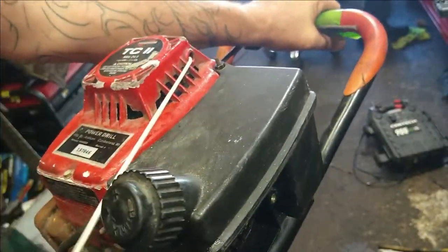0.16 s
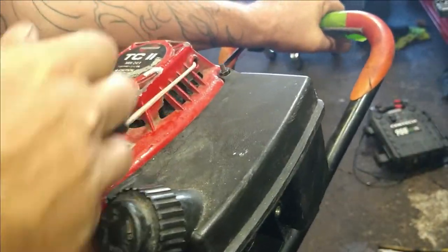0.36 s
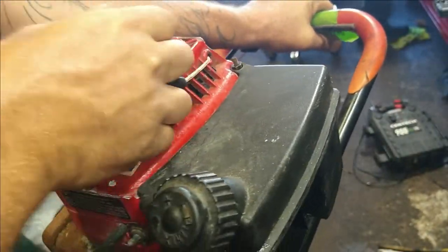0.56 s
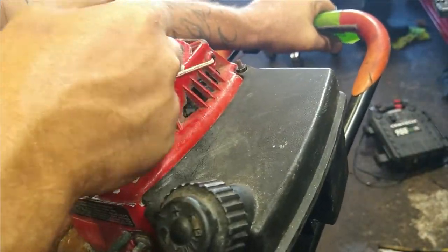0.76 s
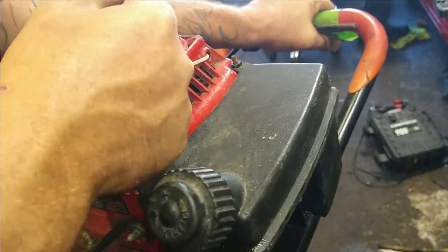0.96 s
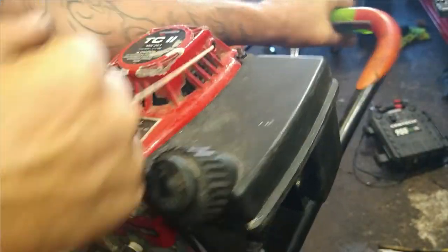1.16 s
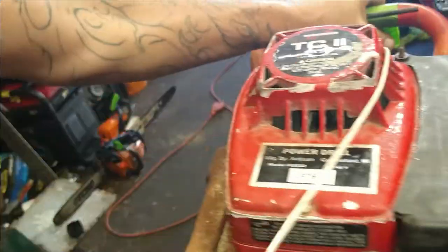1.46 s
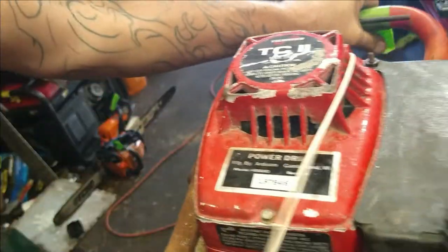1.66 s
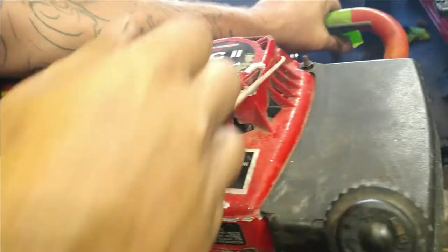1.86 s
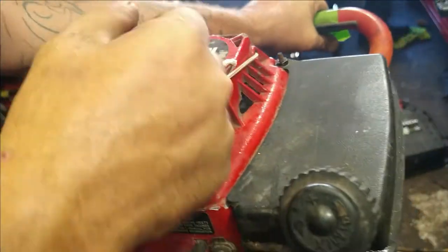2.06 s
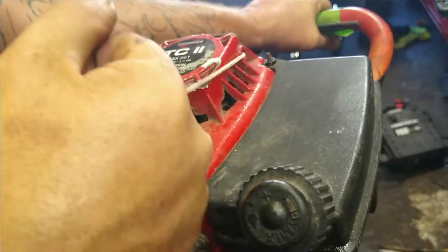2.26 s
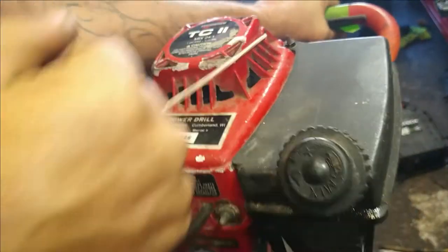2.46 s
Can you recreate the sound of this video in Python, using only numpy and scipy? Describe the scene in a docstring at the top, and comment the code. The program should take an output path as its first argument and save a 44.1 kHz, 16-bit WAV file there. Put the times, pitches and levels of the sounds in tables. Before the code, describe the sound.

A small engine's recoil starter is pulled in a workshop, close up: ratchet clicks slow down, a pause, then a harder pull with rope rasp, knocks and puffs, a long clicking rewind, and another pull beginning.

```python
"""Workshop, close by: the recoil starter of a small two-stroke engine is pulled; the engine never fires.
On each pull filtered noise slips rasp as rope over a low rumble, noise bursts and short rings knock as
the housing, and push-suck pulses puff as the piston. Pawl ticks, faster and then slower, are noise cracks,
pings and chinks over the decaying modes of a steel starter cup. Rope squeaks are rough sine chirps."""
import sys
import numpy as np
from scipy import signal
from scipy.fft import rfft, irfft
from scipy.io import wavfile

SR = 44100
rng = np.random.default_rng(int(sys.argv[2]) if len(sys.argv) > 2 else 0)


def dump_mix(stems):
    """Bounce the given channels to the path in sys.argv[1] as a 16-bit WAV at rate SR."""
    frames = np.atleast_2d(stems).T  # one column per channel
    limited = np.clip(frames, -1, 1)  # hard clip at full scale
    pcm = np.round(limited * 32767).astype(np.int16)
    wavfile.write(sys.argv[1], SR, pcm)


N = 114660
T = np.arange(N) / SR
# shared by pawls, housing and rope: unshared part of the noise power; delay of the shared part on the left
WIDTH, LEFT_LAG_S = 0.4, 0.00013
LOW_PAN_DB = 2  # shared by rumble and piston


def amp(db):
    """Decibels to gain."""
    return 10 ** (np.asarray(db) / 20)


def pan(db):
    """Left and right gains for a source that is db louder on the left."""
    return amp(np.array([[db], [-db]]) / 2)


def colour(x, points):
    """Causal minimum-phase filter through (Hz, dB) points; keeps the power of white noise."""
    point_hz, point_db = np.array(points, float).T
    size = 2 * N
    hz = np.arange(N + 1) * SR / size
    gain = amp(np.interp(np.log(hz + 1), np.log(point_hz), point_db))
    gain = gain / np.sqrt(np.mean(gain ** 2))
    # fold the cepstrum onto positive time for minimum phase
    cepstrum = irfft(np.log(gain))
    cepstrum[1:N] *= 2
    cepstrum[N + 1:] = 0
    response = np.exp(rfft(cepstrum))
    return irfft(rfft(x, size) * response)[..., :N]


def hiss(width, lag_s=0):
    """Noise at two microphones: a shared part, later on the left, and a share of their own."""
    shared, *own = rng.standard_normal((3, N))
    width = np.clip(width, 0, 1)
    common = np.array([np.roll(shared, round(lag_s * SR)), shared])
    return np.sqrt(1 - width) * common + np.sqrt(width) * np.array(own)


def walk(hz):
    """Random points, hz per second, joined by lines; spread near 1."""
    return np.interp(T * hz, np.arange(N), rng.standard_normal(N))


def add(out, s, sound):
    """Mix a sound in at time s."""
    i = int(np.clip(s * SR, 0, N - 1))
    out[..., i:i + sound.shape[-1]] += sound[..., :N - i]


def ping(hz, decay_s, fall_per_s=0):
    """A short damped ring that may sink in pitch, with its own phase at each microphone."""
    t = T[:SR // 10]
    cycles = np.cumsum(hz * np.exp(-fall_per_s * t)) / SR
    wave = np.sin(2 * np.pi * (cycles + rng.random((2, 1))))
    return wave * np.exp(-t / decay_s) * (1 - np.exp(-t * hz / 2))


def pawls():
    """Pawls crack on the cup, bounce once, ping and ring its modes, more fully the closer the ticks."""
    # pawl ticks on the cup: start_s, level_db
    tick_table = [(0.021, -14.5), (0.0702, -16), (0.1087, -10), (0.1346, -9.5), (0.1555, -11.5),
                  (0.1795, -9.5), (0.197, -9), (0.2144, -11), (0.2324, -8), (0.2508, -9), (0.2704, -14),
                  (0.2894, -9), (0.3123, -14), (0.3366, -15), (0.363, -12), (0.4073, -10.5), (0.544, -15.5),
                  (1.1316, -14), (1.4795, -12), (1.4954, -10.5), (1.52, -8), (1.5397, -11), (1.5859, -7),
                  (1.6243, -7), (1.6468, -6.5), (1.6689, -8), (1.685, -9.5), (1.7014, -6), (1.7204, -10.5),
                  (1.7429, -10), (1.7628, -8.5), (1.7859, -10.5), (1.807, -10), (1.8351, -10), (1.8657, -9),
                  (1.903, -10), (1.9583, -9.5), (2.0535, -17), (2.378, -37.5), (2.4651, -11)]
    # steel cup modes: mode_hz, level_db, change_db (once the microphone has swung round the engine)
    cup_modes = [(3537, -4, -9), (3892, -15, -13), (4048, -16, 7), (4317, -14, 11), (4393, -1, -1),
                 (5103, -10, -1), (8050, -14, 0), (9330, -6, -10), (10104, -8, -2), (12995, -9, 1),
                 (13868, -6, -5), (14235, -10, 0)]
    # crack spectrum: freq_hz, relative_db
    crack_spectrum = [(300, -27.5), (800, -6.5), (2000, -7), (3500, 2.5), (5700, -6.5), (7500, -9),
                      (15500, -9)]
    # high chink spectrum: freq_hz, relative_db
    chink_spectrum = [(8800, -25.5), (9900, 1), (11300, -22.5), (13500, -2), (14300, -9.5), (15700, -15)]
    cup_db, cup_scatter_db, cup_t60_s, swing_s = 0.5, 4, 0.17, 1.3
    long_mode, long_t60_s = 1, 0.38  # this mode outlasts the rest
    slow_ring_db, slow_gap_s = -20, 0.08  # full ring loss, from this gap upwards
    detune_hz = 13.8  # spread from tick to tick
    crack_db, crack_rise_s, crack_s, bounce_s = -4, 0.00081, 0.004, 0.004
    chink_db, chink_s = -10.5, 0.011
    ping_low_hz, ping_high_hz, ping_db, ping_s, ping_fall_per_s = 4890, 6620, -5, 0.003, 65

    mode_hz, mode_db, change_db = np.array(cup_modes).T
    is_long = np.arange(len(mode_hz)) == long_mode
    t60_s = np.where(is_long, long_t60_s, cup_t60_s)
    t = T[:SR // 2]
    modes = np.exp((2j * np.pi * mode_hz - np.log(1000) / t60_s)[:, None] * t)
    rings, crack_power, chink_power = np.zeros((2, N)), np.zeros(N), np.zeros(N)
    gaps_s = np.diff(np.array(tick_table)[:, 0], prepend=-1)
    for (s, level_db), gap_s in zip(tick_table, gaps_s):
        slow = min(gap_s / slow_gap_s, 1)
        slow_db = slow_ring_db * np.where(is_long, slow ** 3, np.sqrt(slow))
        scatter_db = cup_scatter_db * rng.standard_normal((2, len(mode_hz)))
        strike = amp(mode_db + slow_db + change_db * (s > swing_s) + scatter_db)
        strike = strike * np.exp(2j * np.pi * rng.random((2, len(mode_hz))))
        detune = np.exp(2j * np.pi * detune_hz * rng.standard_normal() * t)
        add(rings, s, amp(level_db + cup_db) * (strike @ modes * detune).imag)

        crack = amp(level_db) * (1 - np.exp(-t / crack_rise_s)) * np.exp(-t / crack_s)
        for delay_s in 0, bounce_s * (0.5 + rng.random()):
            add(crack_power, s + delay_s, crack ** 2)

        ring = ping(rng.uniform(ping_low_hz, ping_high_hz), ping_s, ping_fall_per_s)
        add(rings, s + bounce_s / 2, amp(level_db + ping_db) * ring)
        add(chink_power, s, (amp(level_db) * np.exp(-t / chink_s)) ** 2)
    cracks = colour(np.sqrt(crack_power) * hiss(WIDTH, LEFT_LAG_S), crack_spectrum)
    chinks = colour(np.sqrt(chink_power) * hiss(WIDTH, LEFT_LAG_S), chink_spectrum)
    return pan(-1.34) * (rings + amp(crack_db) * cracks + amp(chink_db) * chinks)


def rope():
    """Fibres slip in the eyelet in uneven bursts per band, over a low rumble.

    The rumble has wind or handling at the microphone as the second pull starts.
    """
    # rope runs, each a list of breakpoints: time_s, rasp_db, rumble_db
    run_tables = [
        [(0, -29, -29), (0.05, -32.5, -34.5), (0.14, -30.5, -49), (0.25, -26.5, -52), (0.36, -35, -47),
         (0.5, -59, -80)],
        [(1.175, -33, -27), (1.24, -39.5, -30), (1.265, -33.5, -25), (1.40, -28, -26), (1.445, -29.5, -66),
         (1.475, -27.5, -30), (1.575, -37, -40.5), (1.85, -36.5, -48.5), (2.0, -48, -48), (2.18, -89, -50)],
        [(2.467, -29.5, -46), (2.51, -25.5, -51), (2.53, -35.5, -37), (2.56, -31.5, -25.5), (2.6, -24, -59)],
    ]
    # rasp spectrum: freq_hz, relative_db
    rasp_spectrum = [(150, -31), (450, -7), (720, 7.5), (1100, -7.5), (1500, 8), (1900, -3), (2600, 3.5),
                     (6000, 1), (12000, -8.5)]
    # rumble spectrum: freq_hz, relative_db
    rumble_spectrum = [(45, -25.5), (80, -4.5), (180, -4.5), (400, -9.5), (1200, -19.5), (5000, -70.5)]
    rope_db, slips_per_s, flutter_db, flutter_hz = 4, 9000, 5.5, 111.24

    rasp_level, rumble_level = np.zeros(N), np.zeros(N)
    for run in run_tables:
        s, rasp_db, rumble_db = np.array(run).T
        moving = (T >= s[0]) & (T <= s[-1])
        rasp_level += moving * amp(np.interp(T, s, rasp_db))
        rumble_level += moving * amp(np.interp(T, s, rumble_db))
    slips = rng.random(N) < slips_per_s / SR
    grains = rasp_level * slips / np.std(slips) * hiss(WIDTH, LEFT_LAG_S)
    top = colour(grains, rasp_spectrum)
    bursts = 0
    # peel off bands from below; the part above the last edge gets no flutter
    for edge_hz in (2000, 4500, 8500):
        low_pass = signal.butter(4, edge_hz, fs=SR, output="sos")
        band = signal.sosfiltfilt(low_pass, top)
        top = top - band
        bursts = bursts + band * amp(flutter_db * walk(flutter_hz))
    rumble = colour(rumble_level * hiss(0.1), rumble_spectrum)
    return amp(rope_db) * (bursts + top) + pan(LOW_PAN_DB) * rumble


def housing():
    """Dull knocks of reel and handle ring the housing's short modes and leave a brief tail."""
    # knocks against the housing: start_s, level_db
    knock_table = [(0.008, -11), (0.349, -17.5), (0.362, -18.5), (0.471, -17.5), (0.581, -23), (0.804, -33),
                   (1.008, -39.5), (1.168, -18.5), (1.265, -7), (1.303, -6), (1.379, -12), (1.397, -14),
                   (1.462, -10), (2.044, -18), (2.054, -16), (2.107, -14.5), (2.426, -25.5), (2.465, -10),
                   (2.495, -12.5), (2.538, -14), (2.577, -19)]
    # knock spectrum: freq_hz, relative_db
    knock_spectrum = [(100, -26.5), (750, 1.5), (1550, 5), (2600, 5.5), (3500, 0), (7000, -8.5),
                      (12000, -29.5)]
    knock_db, rise_s, knock_s, tail_s, tail_db = -6.5, 0.001134, 0.0051, 0.023, -6.5
    ring_db, ring_s, ring_scatter = -13, 0.009, 0.013  # scatter as a fraction of pitch

    t = T[:SR // 4]
    force, rings = np.zeros(N), np.zeros((2, N))
    decay = np.exp(-t / knock_s) + amp(tail_db) * np.exp(-t / tail_s)
    blow = (1 - np.exp(-t / rise_s)) * decay
    for s, level_db in knock_table:
        add(force, s, amp(level_db) * blow)
        for mode_hz in (1450, 1600, 2650):
            hz = mode_hz * (1 + ring_scatter * rng.standard_normal())
            add(rings, s + rise_s, amp(level_db) * ping(hz, ring_s))
    knocks = colour(force * hiss(WIDTH, LEFT_LAG_S), knock_spectrum)
    return amp(knock_db) * knocks + amp(ring_db) * rings


def piston():
    """The piston pushes and sucks air in short pulses, heard without deep bass."""
    # puffs of air from the cylinder: centre_s, level_db
    puff_table = [(0.361, -24), (1.225, -21), (1.261, -14), (1.317, -12.5), (1.361, -9), (1.409, -8),
                  (1.479, -8.5), (1.559, -17.5), (2.548, -12), (2.598, -8)]
    puff_s, fade_per_s, low_cut_hz = 0.0005, 130, 80

    out = np.zeros(N)
    for s, level_db in puff_table:
        u = (T - s) / puff_s
        fade = np.exp(-((T - s) * fade_per_s) ** 2)
        out -= amp(level_db) * 2 * u / (1 + u ** 2) * fade
    high_pass = signal.butter(3, low_cut_hz, "high", fs=SR, output="sos")
    return pan(LOW_PAN_DB) * signal.sosfiltfilt(high_pass, out)


def squeaks():
    """Short rough stick-slip chirps of the rope in its eyelet swell as it tightens."""
    # rope squeaks: start_s, length_s, start_hz, end_hz, level_db
    squeak_table = [(1.237, 0.06, 2385, 2390, -29.5), (1.26, 0.0059, 1488, 2080, -15.5),
                    (1.31, 0.0954, 1620, 1418, -25), (2.262, 0.05, 1590, 1600, -52),
                    (2.568, 0.02, 1456, 2260, -14)]
    pitch_rough, level_rough_db = 0.05, 6.76  # pitch as a fraction

    out = np.zeros(N)
    for s, length_s, start_hz, end_hz, level_db in squeak_table:
        u = np.clip((T - s) / length_s, 0, 1)
        hz = start_hz + (end_hz - start_hz) * u
        hz = hz * (1 + pitch_rough * walk(750))
        swell = np.sqrt(abs(np.sin(np.pi * u ** 2)))
        level = amp(level_db + level_rough_db * walk(400))
        out += level * swell * np.sin(2 * np.pi * np.cumsum(hz) / SR)
    return pan(2) * out


def room(x):
    """Dense workshop reflections as decaying noise; the treble dies first."""
    room_db, t60_s, treble_t60_s, split_hz, onset_s = -8.5, 0.31, 0.18, 3000, 0.0066
    t = T[:SR // 2]
    noise = rng.standard_normal((2, len(t)))
    low = signal.sosfilt(signal.butter(2, split_hz, fs=SR, output="sos"), noise)
    tail = low * amp(-60 * t / t60_s) + (noise - low) * amp(-60 * t / treble_t60_s)
    tail = tail * np.clip(t / onset_s, 0, 1)
    tail = tail / np.sqrt(np.sum(tail ** 2) / 2)
    return x + amp(room_db) * signal.fftconvolve(x, tail, axes=1)[:, :N]


def workshop():
    """Steady coloured noise, strongest in the bass, is the workshop's quiet background."""
    # background spectrum: freq_hz, relative_db
    shop_spectrum = [(25, -58), (65, -7.5), (130, -1), (270, -5), (2500, -21.5), (16000, -51)]
    return amp(-46) * colour(hiss(0.24), shop_spectrum)


def scene():
    """The starter in the room, over the workshop background."""
    starter = pawls() + rope() + housing() + piston() + squeaks()
    return room(starter) + workshop()


def record(dry):
    """The recorder rounds the loudest peaks and cuts the top."""
    top_hz = 15900
    low_pass = signal.ellip(10, 0.2, 80, top_hz, fs=SR, output="sos")
    return signal.sosfilt(low_pass, np.tanh(dry))


dry = scene()
out = record(dry)
dump_mix(out)
```